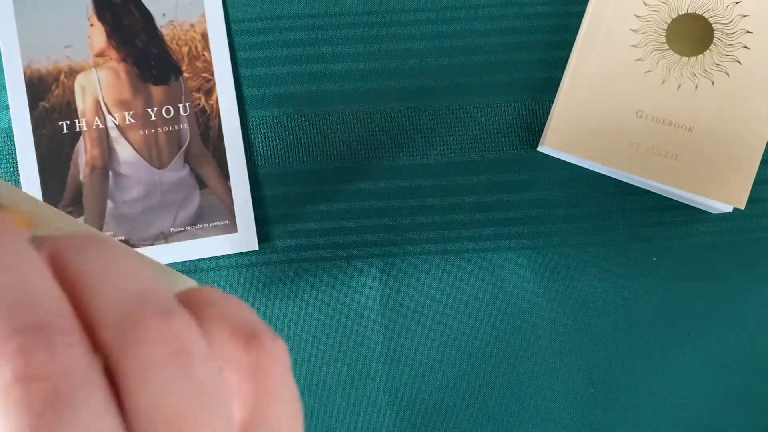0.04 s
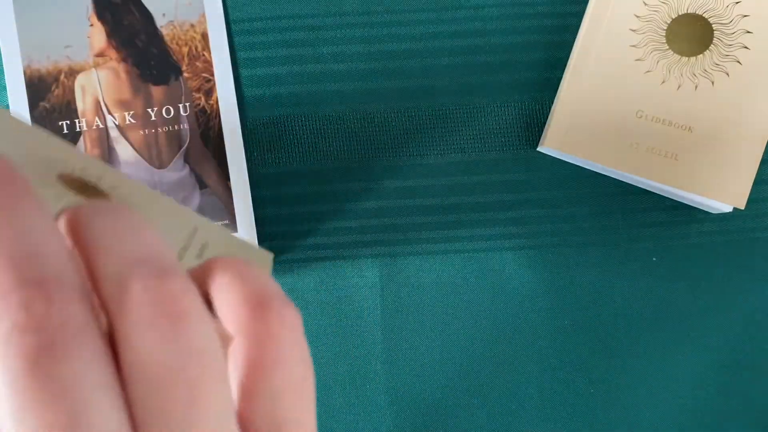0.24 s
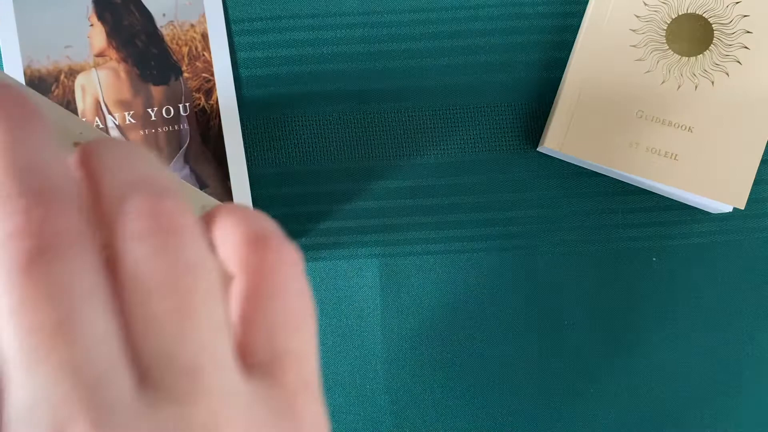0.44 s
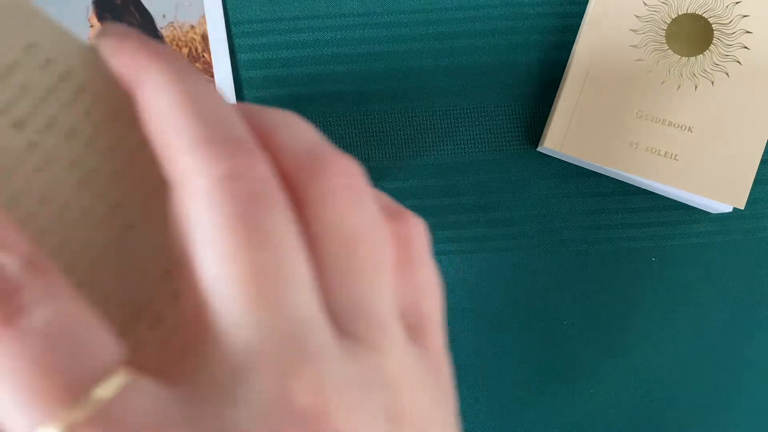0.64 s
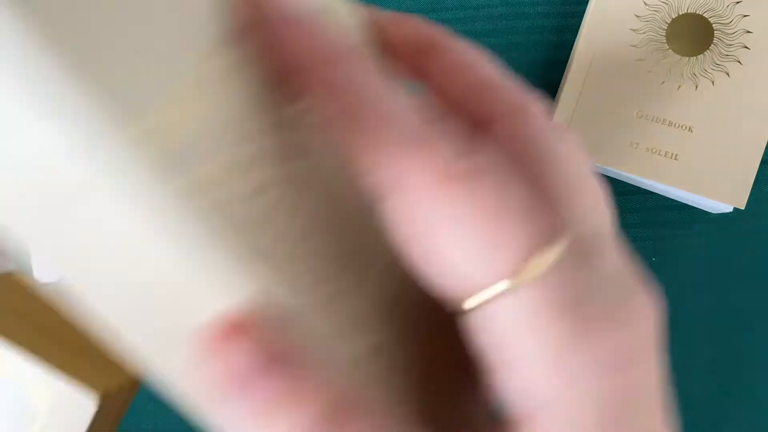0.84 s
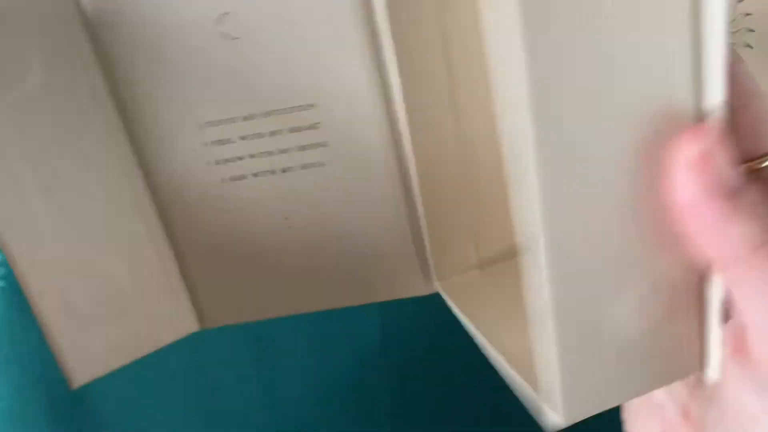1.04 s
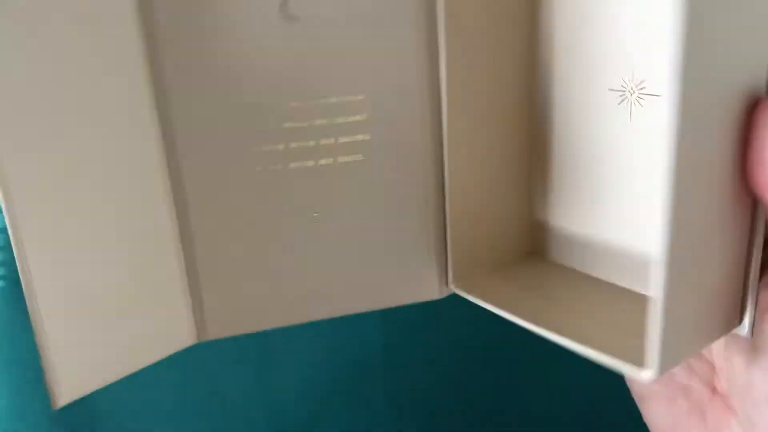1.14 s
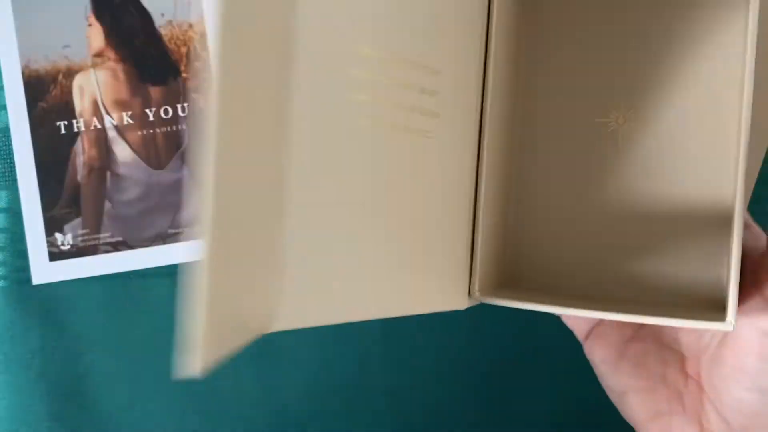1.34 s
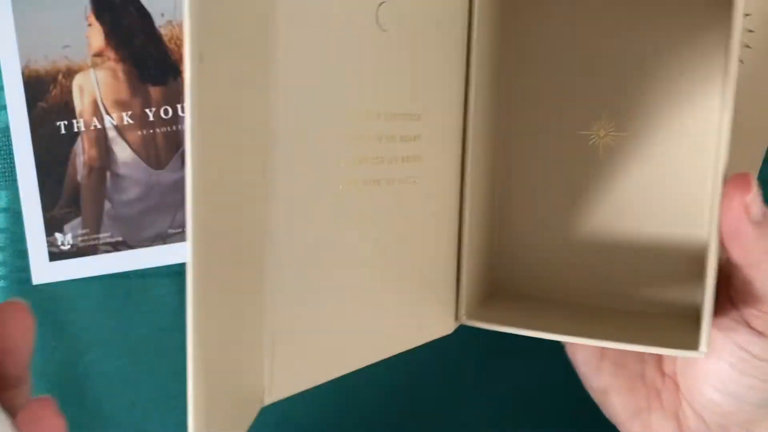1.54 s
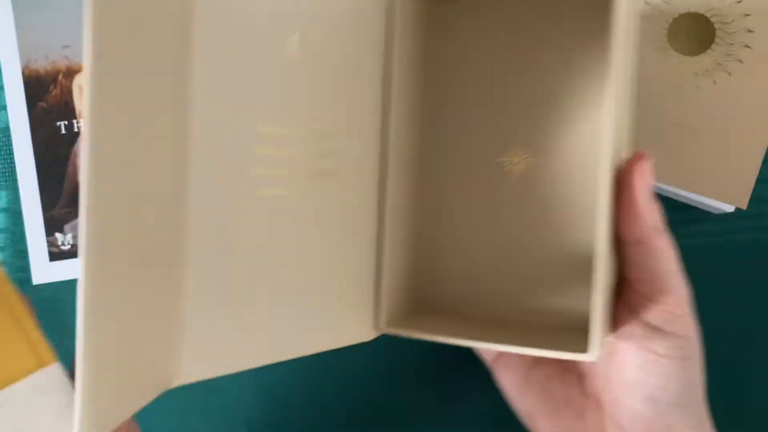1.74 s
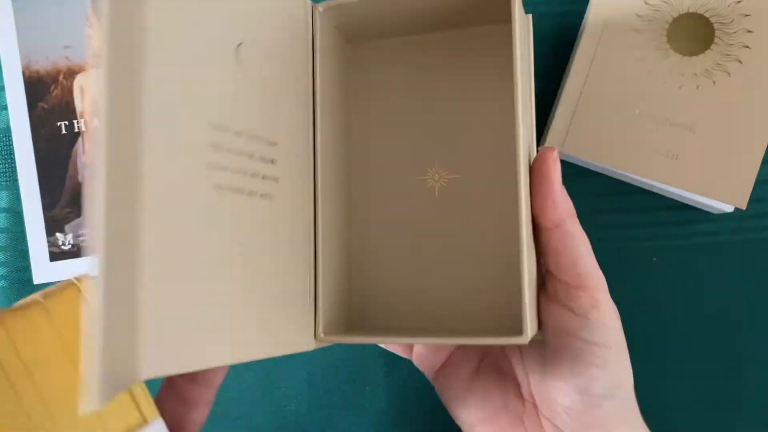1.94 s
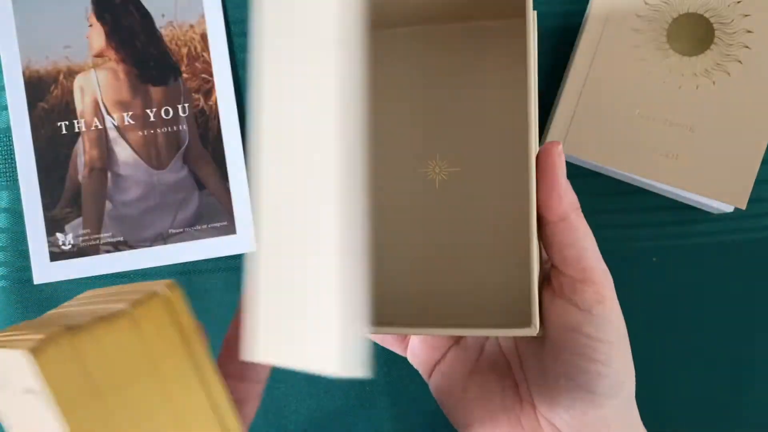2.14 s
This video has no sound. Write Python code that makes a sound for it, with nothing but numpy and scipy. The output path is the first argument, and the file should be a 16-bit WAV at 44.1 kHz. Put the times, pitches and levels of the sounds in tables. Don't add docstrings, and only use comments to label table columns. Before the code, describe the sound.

Close stereo sound of hands on a stiff cardboard box: an early cluster of boxy knocks and lid scraping, quieter rubbing and small ticks, then a few hollow nail taps, indoors with little echo.

```python
import sys
import numpy as np
from scipy import signal
from scipy.fft import rfft, irfft
from scipy.io import wavfile
from scipy.ndimage import uniform_filter1d

SR = 44100
rng = np.random.default_rng(int(sys.argv[2]) if len(sys.argv) > 2 else 0)


def to_wav(sig):
    pcm = np.clip(np.atleast_2d(sig), -1, 1) * 32767
    pcm = np.round(pcm).astype(np.int16)
    wavfile.write(sys.argv[1], SR, pcm.T)


def makeup_ratio(level_db):
    decades = np.asarray(level_db, float) / 20
    return 10 ** decades


N = 97020
T = np.arange(N) / SR
HZ = np.maximum(np.fft.rfftfreq(N, 1 / SR), 1)

# pitch in Hz, level in dB, decay by 60 dB in seconds.
CLOSED_BOX = [(200, -15, .03), (360, -2, 0.04), (540, -4, .03), (800, 1, 0.02), (990, -10, .015),
              (1210, -3, 0.02), (1750, -10, .01), (2250, -12, 0.01), (2440, -14, 0.02), (3330, -19, 0.008)]
# time in seconds, level in dB.
HOLLOW_LEVEL = [(1.15, -91), (1.3, -71.5), (1.4, -66), (1.75, -65), (2.0, -63.5), (2.2, -69.5)]


def unit(x):
    return x / np.sqrt(np.mean(x ** 2))


def curve(rows, col=1):
    rows = np.array(rows, float)
    return np.interp(T, rows[:, 0], rows[:, col])


def hue(x, points):
    hz, db = np.array(points, float).T
    gain = makeup_ratio(np.interp(np.log(HZ), np.log(hz), db))
    return unit(irfft(rfft(x) * gain, N))


def ring(x, hz, t60):
    pole = np.exp(2j * np.pi * hz / SR - np.log(1000) / (t60 * SR))
    mode = signal.lfilter([1], [1, -pole], x).imag
    return signal.sosfilt(signal.butter(2, hz / 2, "high", fs=SR, output="sos"), mode)


def walk(rate):
    k = int(SR / rate)
    steps = np.repeat(rng.standard_normal(N // k + 1), k)
    return unit(uniform_filter1d(uniform_filter1d(steps, k), k)[:N])


def grit():
    grains_per_s, grain_db, flicker_db = 2500, 3.5, 1
    slips = rng.random(N) < grains_per_s / SR
    strength = makeup_ratio(grain_db * np.minimum(rng.exponential(size=N), 4.0))
    grains = unit(rng.standard_normal(N) * (1 + slips * strength))
    return grains * makeup_ratio(flicker_db * walk(40))


def add(out, s, db, x):
    i = int(s * SR)
    out[i:i + len(x)] += makeup_ratio(db) * x[:N - i] / np.abs(x).max()


def knocks(hits, modes):
    bend_s = .0035
    roughness, detune = 4.0, .007
    crack_db, crack_ms, crack_hz = -19, 4, 6000
    out, t = np.zeros(N), T[:6000]
    for s, db, contact_ms, hard_db in hits:
        rough, snap = rng.standard_normal((2, len(t)))
        chance = rng.standard_normal((len(modes), 3))
        body = 0
        for (hz, mode_db, t60), (off_pitch, off_db, turn) in zip(modes, chance):
            late = np.maximum(t - bend_s * np.sqrt(250 / hz), 0) * 1000 / contact_ms
            hz = hz * (1 + detune * off_pitch)
            swing = np.sin(2 * np.pi * (hz * t + turn))
            push = late * np.exp(-2 * late) * (swing + roughness * rough * min(hz / 2000, 1))
            gain = makeup_ratio(mode_db + hard_db * np.log2(hz / 700) + off_db)
            body = body + gain * unit(ring(push, hz, t60))
        crack = ring(snap * np.exp(-t * 1000 / crack_ms), crack_hz, 0.00052)
        add(out, s, db, unit(body) + makeup_ratio(crack_db + 2 * hard_db) * unit(crack))
    return out


def closed_box_knocks():
    # start in seconds, level in dB, contact in ms, hardness in dB per octave.
    shut_hits = [(.129, -48.5, 1.2, 2), (.1895, -35, 3, 0), (.198, -39, 5, -2), (.2268, -19.5, 1.0, 1),
                 (.2312, -17.5, 2.2, -1), (.243, -29, 3, -2), (.2495, -29, 3, -2.5), (.256, -31.5, 4, -2.5),
                 (.2755, -42, 2, 7), (.282, -40, 5, -2), (.301, -39, 4, -1), (.377, -48, 4, 4),
                 (.385, -47, 3, 1), (.425, -50, 1, 1), (.444, -49, 4, 0), (.461, -47, 4, -2),
                 (.479, -35.5, 1.8, 7), (.4815, -42, 1.5, -4)]
    return knocks(shut_hits, CLOSED_BOX)


def lid_pop():
    # start in seconds, level in dB, contact in ms, hardness in dB per octave.
    lid_hits = [
        (.3095, -29, 1.2, 5),
        (.3115, -25, 5, -2),
    ]
    # pitch in Hz, level in dB, decay by 60 dB in seconds.
    lid_modes = [(120, -27, .04), (300, -22, .03), (447, -15, .04), (546, -14, .03), (634, -17, .03),
                 (843, 0, 0.075), (1330, -12, 0.012), (2400, -13, 0.012)]
    grip_at_s, grip_s = .333, .003
    grip = np.clip((grip_at_s - T) / grip_s + 1, .1, 1)
    return knocks(lid_hits, lid_modes) * grip


def wall_knock():
    # start in seconds, level in dB, contact in ms, hardness in dB per octave.
    wall_hits = [(1.809, -26, 1.4, 1)]
    # pitch in Hz, level in dB, decay by 60 dB in seconds.
    wall_modes = [(56.8, -10, 0.1), (207, 2, 0.02), (366, -3, 0.02), (700, -3, 0.04), (1190, -5, 0.018),
                  (1860, -10, 0.008), (2950, -18, 0.006), (4200, -21, .005)]
    return knocks(wall_hits, wall_modes)


def open_box_taps():
    # start in seconds, level in dB, contact in ms, hardness in dB per octave.
    open_hits = [
        (1.876, -18.5, 1.2, .5),
        (1.894, -26.5, 1.8, -1),
    ]
    # pitch in Hz, level in dB, decay by 60 dB in seconds.
    open_modes = [(62, -10, .1), (225, 0, 0.042), (430.7, -1.5, .03), (700, -8, 0.03), (1202, -5, 0.018),
                  (1815, -9, .01), (2300, -18, .007), (2955, -20, .008), (4500, -22, .005),
                  (5990, -17, 0.0091)]
    return knocks(open_hits, open_modes)


def flap_drop():
    # start in seconds, level in dB, contact in ms, hardness in dB per octave.
    flap_hits = [
        (1.217, -49, .8, 5),
        (1.2195, -44, 1.5, -3),
    ]
    # pitch in Hz, level in dB, decay by 60 dB in seconds.
    flap_modes = [(200, -6, .03), (335, 0, 0.035), (720, -15, 0.02), (1500, -8, 0.02), (2300, -11, 0.02)]
    return knocks(flap_hits, flap_modes)


def scrape():
    # time in seconds, level in dB.
    scrape_level = [(.09, -79), (.18, -59), (.29, -49), (.36, -56), (.415, -66), (.46, -52.5), (.51, -62),
                    (.6, -93.5)]
    rub = grit()
    body = sum(makeup_ratio(db) * unit(ring(rub, hz, 0.37 * t60)) for hz, db, t60 in CLOSED_BOX)
    return unit(body) * makeup_ratio(curve([(0.018, -100)] + list(scrape_level) + [(.7, -110)]))


def slides():
    # time in seconds, level in dB, mid rub and dull rub in relative dB.
    on_closed_box = [(0, -76, 2.5, 4.5), (.035, -86, 3, 3), (.06, -71.5, 3, -6.5), (.115, -72.5, 2.5, -6),
                     (.13, -87, 5.5, 4), (.18, -81.5, 2, 4.5), (.2, -64, 5.5, 1), (.235, -51, 1.5, 4.5),
                     (.27, -64, 1.5, 0)]
    on_lid = [(.29, -68, 4, 5), (.33, -67, 6.2, 3.5), (.39, -78, 2.8, 1.5), (.415, -89.5, 4.2, 22),
              (.445, -72, 4.5, 9.5), (.49, -71, 6.5, 4.5), (.51, -89.5, 10.6, 14.5), (.58, -105, 12, 16),
              (.7, -106, 6, 5.5)]
    turning = [(.8, -78, -4, -14), (.94, -75.5, 6.5, -11), (.98, -80.5, 5, 2), (1.02, -71.5, 5, -13.5),
               (1.12, -67.5, -0.5, -15), (1.14, -78, 0, -5), (1.17, -69, 10.5, -14), (1.21, -87, -2, 15)]
    on_open_box = [(1.235, -69, 4.2, 1.5), (1.34, -70.5, 3.1, -3), (1.36, -92.5, 8, 15),
                   (1.42, -87.5, 6.74, 19), (1.45, -71, 2, 3), (1.49, -72.5, 1.4, 6), (1.51, -104, 6, 24),
                   (1.632, -103, 8, 30)]
    tilting = [(1.642, -65.5, 3.5, -1.5), (1.71, -61.5, -1.5, -12), (1.8, -69, 4.5, 5.5),
               (1.86, -76.5, 4, 11.5), (1.93, -76.5, 1, 13.5), (2.04, -72.5, 0.5, 9),
               (2.115, -78.5, 0.5, 12), (2.14, -98.5, -7, 19.5), (2.2, -94, -2, 16)]
    # pitch in Hz, level in dB per Hz.
    skin_hue = [(4000, -24), (6000, 4.5), (8000, 3.5), (10500, -2), (12500, 3), (14500, 1.5), (15800, -3)]
    card_hue = [(900, -24.5), (1800, -10), (2650, -2), (3400, -1.5), (5000, 1), (6500, -9), (12000, -20)]
    board_hue = [(250, -8), (600, -3), (1000, -5.5), (1500, -7), (2000, -12), (2600, -10), (3200, -22),
                 (7000, -50)]
    rows = list(on_closed_box) + list(on_lid) + list(turning) + list(on_open_box) + list(tilting)
    hiss = makeup_ratio(7.0) * hue(grit(), skin_hue)
    mid_rub = makeup_ratio(curve(rows, col=2)) * hue(grit(), card_hue)
    dull_rub = makeup_ratio(curve(rows, col=3)) * hue(grit(), board_hue)
    return (hiss + mid_rub + dull_rub) * makeup_ratio(curve(rows))


def rasps():
    # start in seconds, length in seconds, level in dB, pitch in Hz, width as a share of pitch.
    catches = [(1.0, 0.125, -66, 5050, .06), (1.228, .04, -65, 2650, .1), (1.42, 0.09, -70, 2650, .08),
               (1.615, 0.16, -68, 2630, .06), (.93, 0.1, -77, 720, .15), (1.06, .13, -77, 750, .15)]
    out = 0
    for s, length, db, hz, share in catches:
        x = np.clip((T - s) / length, 0, 1)
        swell = np.sqrt(np.minimum(6 * x, 1) * np.minimum(3 * (1 - x), 1))
        out = out + makeup_ratio(db) * swell * unit(ring(grit(), hz, 2.2 / (share * hz)))
    return out


def ticks():
    # start in seconds, level in dB, pitch in Hz.
    nail_ticks = [
        (.926, -51.5, 2410),
        (.927, -58.5, 700),
        (1.640, -48, 2660),
        (2.186, -61, 1030),
    ]
    out, t = np.zeros(N), T[:3000]
    for s, db, hz in nail_ticks:
        click = rng.standard_normal(len(t)) * np.exp(-t / 0.0029)
        mode = ring(click, hz, 3.7 * 12 / hz)
        add(out, s, db, unit(mode) + .5 * unit(click))
    return out


def hollow():
    # pitch in Hz, width in Hz, level in dB.
    hollow_peaks = [(367, 45, 0.5), (265, 40, -3.5), (202, 120, -7)]
    hum = 0
    for hz, width, db in hollow_peaks:
        hum = hum + makeup_ratio(db) * unit(ring(rng.standard_normal(N), hz, 2.2 / width))
    return unit(hum) * makeup_ratio(curve(HOLLOW_LEVEL))


def room_tail(near):
    room_t60_s, room_db, room_low_cut_hz = 0.083, -15.5, 400
    early_t60_s, early_db = 0.0092, -14
    t = T[:SR // 2]
    tail = rng.standard_normal((2, len(t))) * makeup_ratio(-60 * t / room_t60_s) * (t > .003)
    tail = signal.sosfilt(signal.butter(1, room_low_cut_hz, "high", fs=SR, output="sos"), tail)
    early = rng.standard_normal((2, len(t))) * makeup_ratio(-60 * t / early_t60_s)
    wet = makeup_ratio(room_db) * tail / np.linalg.norm(tail[0]) + makeup_ratio(early_db) * early / np.linalg.norm(early[0])
    return signal.fftconvolve(near[None], wet, axes=1)[:, :N]


def thumps():
    # start in seconds, length in seconds, level in dB, pitch in Hz.
    jolts = [(.47, .04, -50, 85), (1.227, .048, -44, 58), (1.43, .05, -56, 120), (1.818, .04, -47, 48)]
    out = 0
    for s, length, db, hz in jolts:
        x = np.clip((T - s) / length, 0, 1)
        swell = np.sin(np.pi * x) ** .6 * (x < 1)
        out = out + makeup_ratio(db) * swell * np.sin(2 * np.pi * hz * (T - s))
    return out


def rumble():
    # time in seconds, level in dB.
    rumble_level = [(0, -68), (.2, -60.5), (.47, -61.5), (.63, -74), (.8, -64), (.97, -64), (1.06, -56),
                    (1.14, -62), (1.2, -58), (1.27, -66), (1.45, -61), (1.9, -62), (2.2, -65)]
    # pitch in Hz, level in dB per Hz.
    rumble_hue = [(22, -40), (36, -15), (52, 3.5), (75, -1.5), (120, -11.5), (250, -42)]
    return hue(rng.standard_normal(N), rumble_hue) * makeup_ratio(curve(rumble_level) + 1.5)


def air():
    # pitch in Hz, level in dB per Hz.
    air_hue = [(100, 13.5), (250, 5), (450, -5.5), (1500, -9), (4000, -18), (9000, -28), (12500, -34),
               (16000, -50)]
    return hue(rng.standard_normal(N), air_hue) * makeup_ratio(-80.5)


def wide_air():
    # pitch in Hz, level in dB per Hz.
    wide_hue = [(60, -8), (200, 0), (600, -2), (1300, -7), (2500, -15), (8000, -30)]
    level_db = -80 + .15 * (curve(HOLLOW_LEVEL) + 65)
    return hue(rng.standard_normal(N), wide_hue) * makeup_ratio(level_db) * np.array([[1], [-1]])


def scene():
    near = closed_box_knocks() + lid_pop() + wall_knock() + open_box_taps() + flap_drop()
    near = near + scrape() + slides() + rasps() + ticks() + hollow()
    return near + room_tail(near) + thumps() + rumble() + air() + wide_air()


def roll_off(x):
    return signal.sosfilt(signal.butter(12, 16230, fs=SR, output="sos"), x)


def record(dry):
    # pitch in Hz, phase by which left leads in radians.
    port_lead = [(600, .55), (1400, -.3), (2760, .8), (4300, .6), (4650, .1), (5500, .6), (6900, 3.1),
                 (8250, 3.25), (9600, 6.15), (11200, 6.5), (12800, 9.3), (14600, 9.6), (15800, 12.4)]
    # pitch in Hz, left over right in dB.
    port_db = [(60, 0), (300, -2.5), (750, 2.5), (1300, -2), (3000, -2), (5000, 0)]
    lead = np.array([(0.016, 0)] + list(port_lead))
    tilt = np.array(port_db, float)
    phase = np.interp(HZ, lead[:, 0], lead[:, 1])
    level_db = np.interp(np.log(HZ), np.log(tilt[:, 0]), tilt[:, 1])
    shift = np.exp(.5j * phase) * makeup_ratio(level_db / 2)
    both = np.array([shift, 1 / shift]) * (HZ < 15800)
    ports = irfft(rfft(dry, axis=1) * both, N, axis=1)
    return roll_off(ports)


dry = scene()
out = record(dry)
to_wav(out)
```